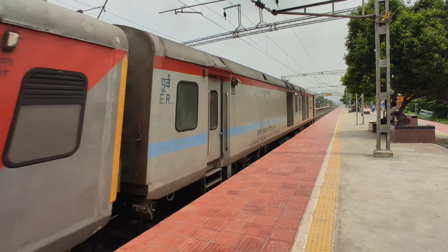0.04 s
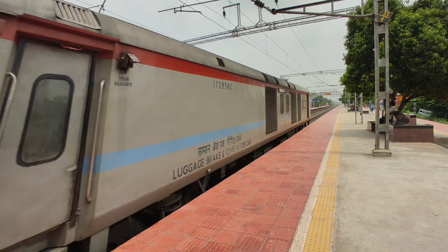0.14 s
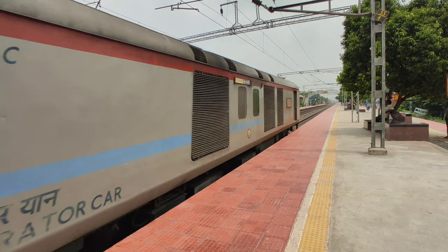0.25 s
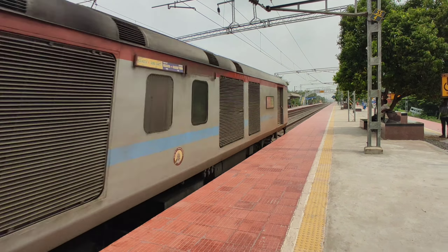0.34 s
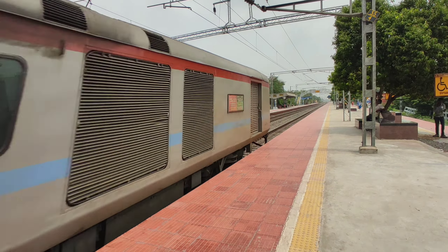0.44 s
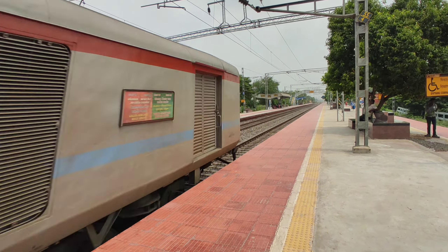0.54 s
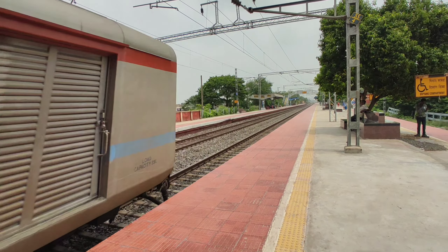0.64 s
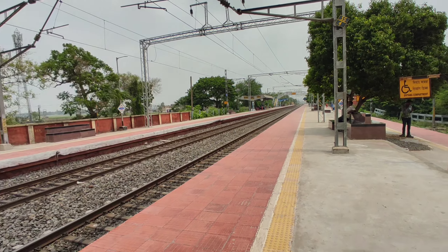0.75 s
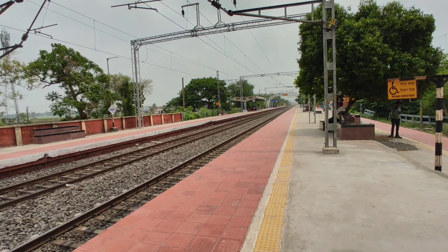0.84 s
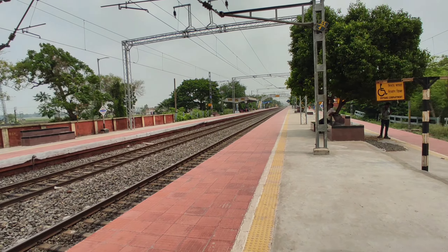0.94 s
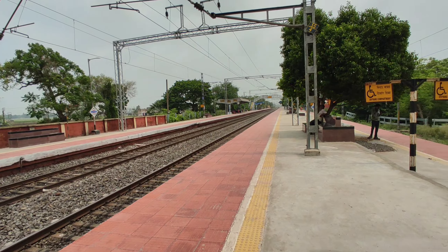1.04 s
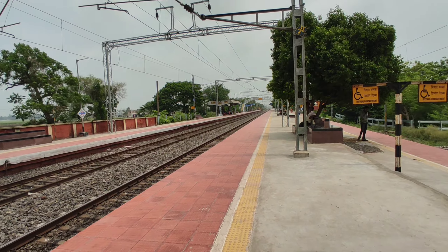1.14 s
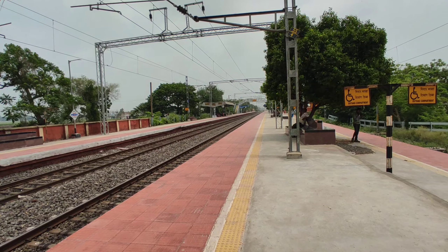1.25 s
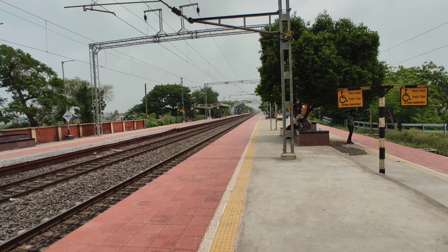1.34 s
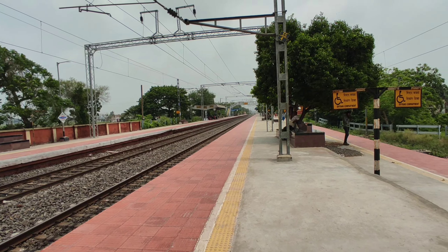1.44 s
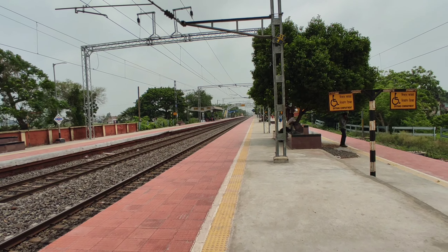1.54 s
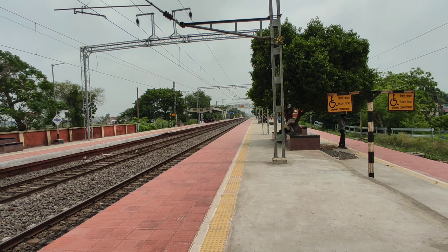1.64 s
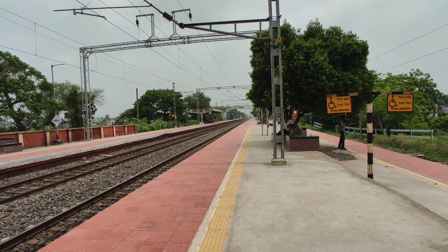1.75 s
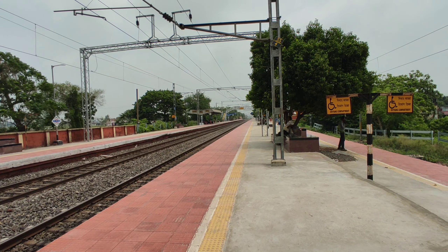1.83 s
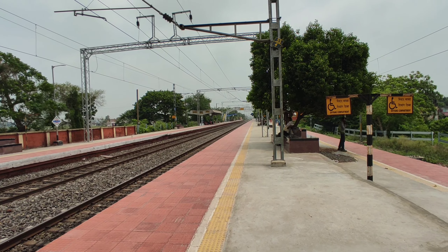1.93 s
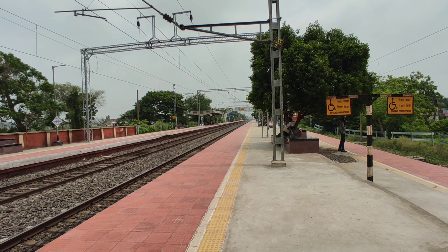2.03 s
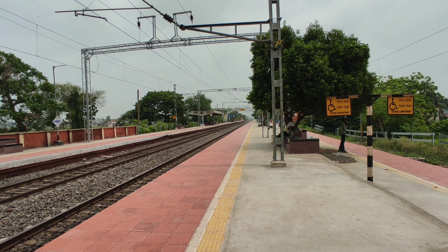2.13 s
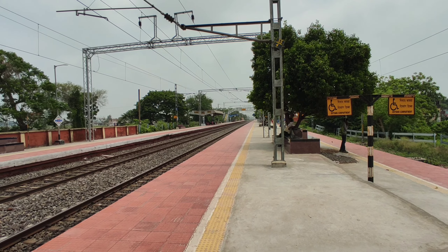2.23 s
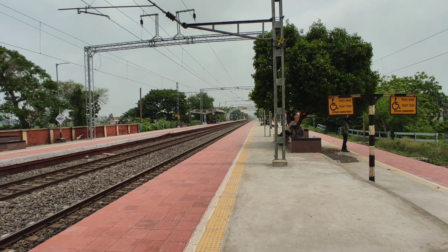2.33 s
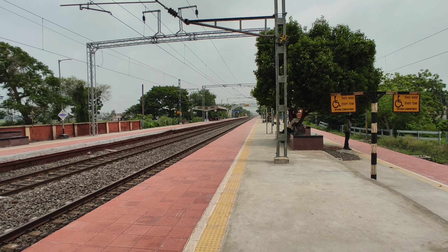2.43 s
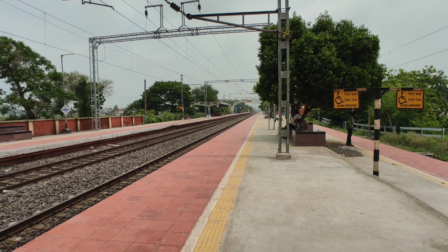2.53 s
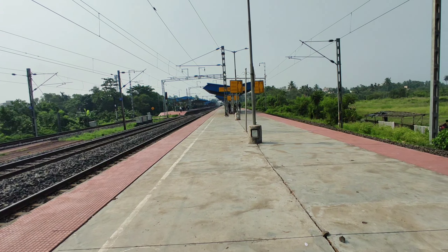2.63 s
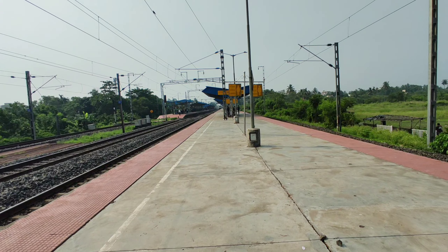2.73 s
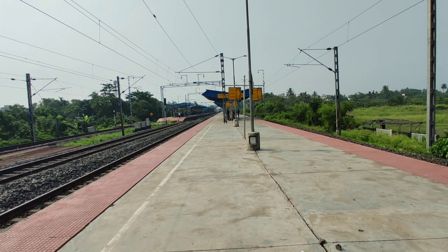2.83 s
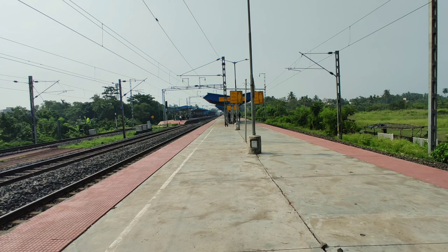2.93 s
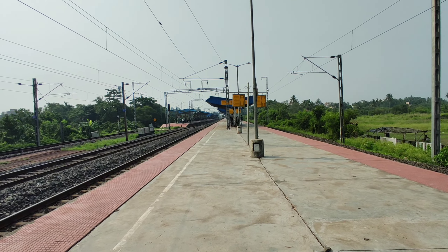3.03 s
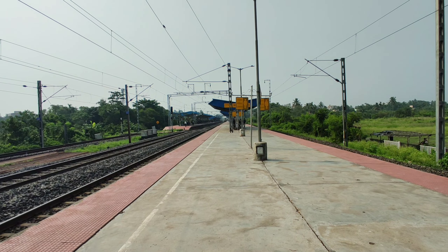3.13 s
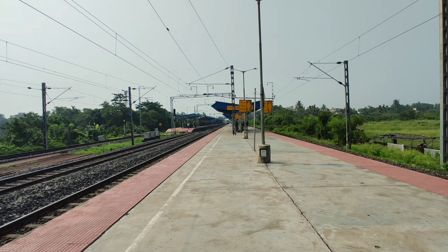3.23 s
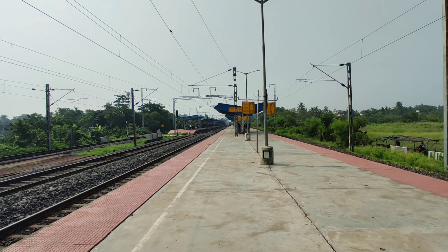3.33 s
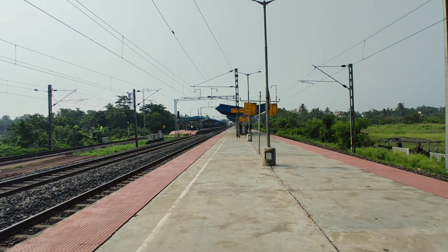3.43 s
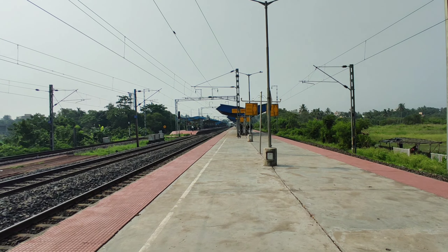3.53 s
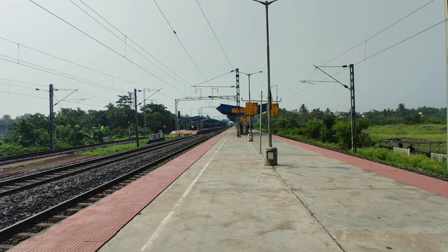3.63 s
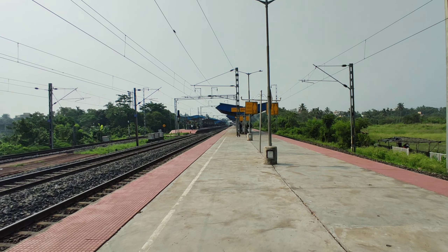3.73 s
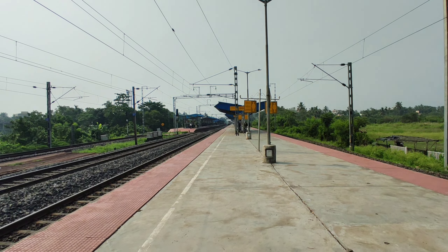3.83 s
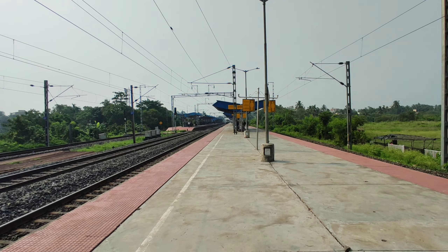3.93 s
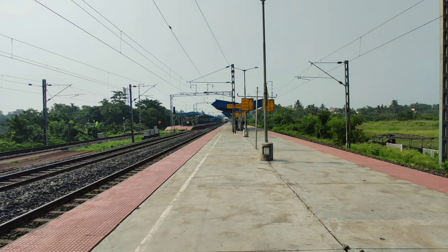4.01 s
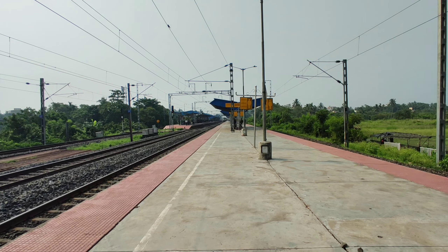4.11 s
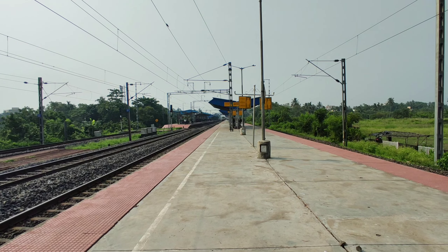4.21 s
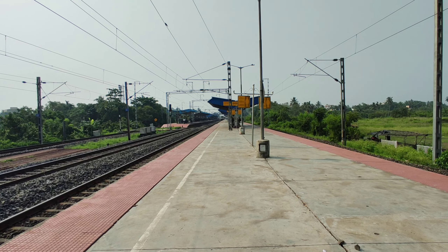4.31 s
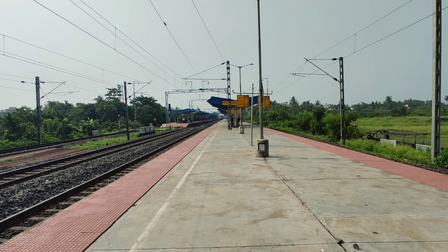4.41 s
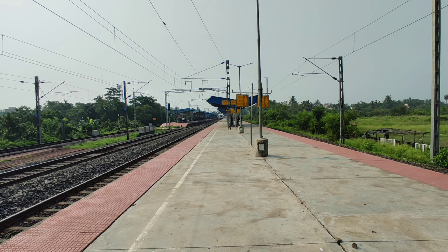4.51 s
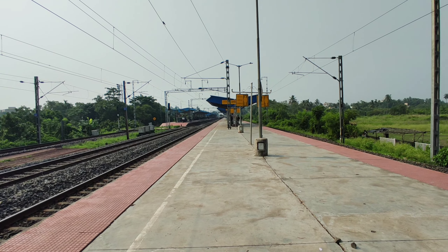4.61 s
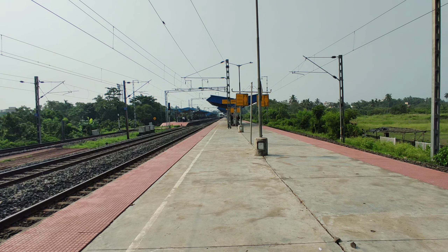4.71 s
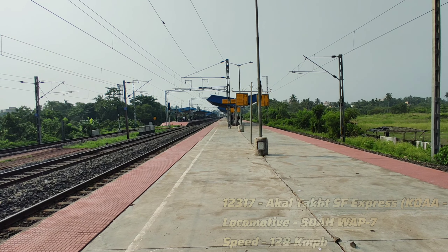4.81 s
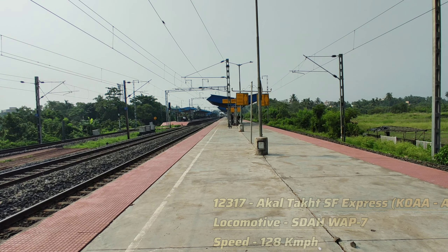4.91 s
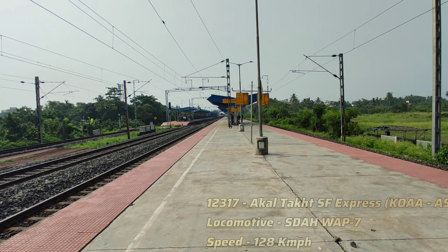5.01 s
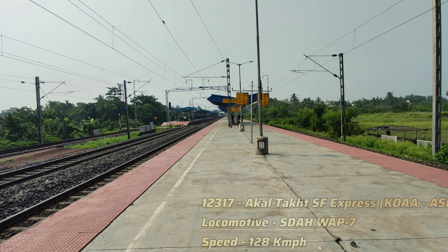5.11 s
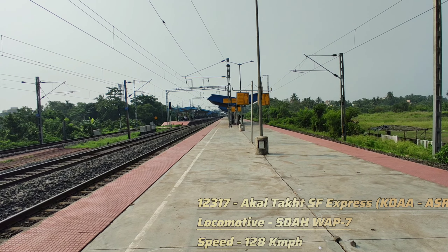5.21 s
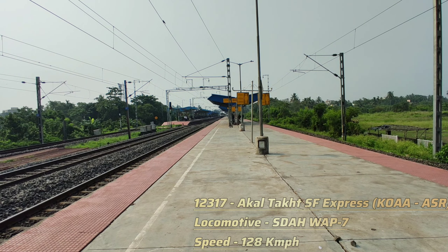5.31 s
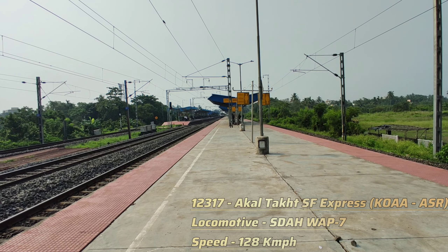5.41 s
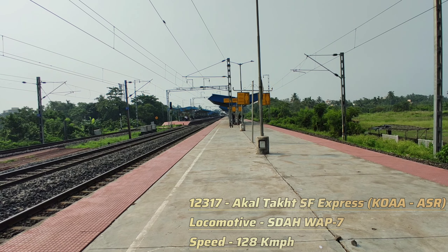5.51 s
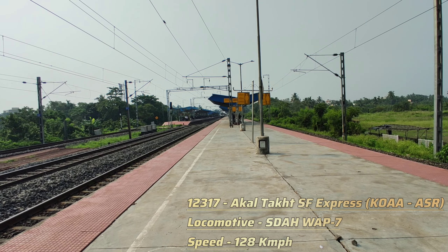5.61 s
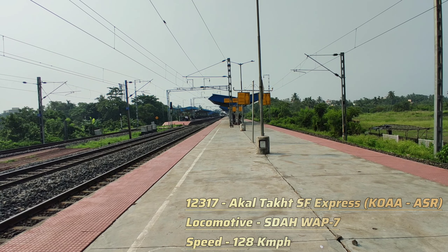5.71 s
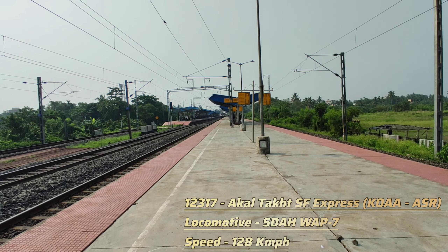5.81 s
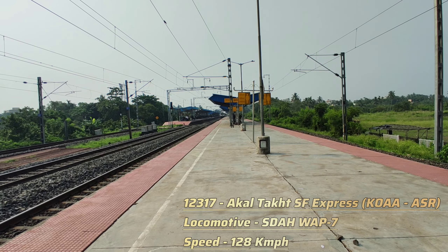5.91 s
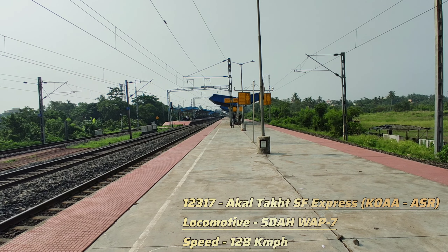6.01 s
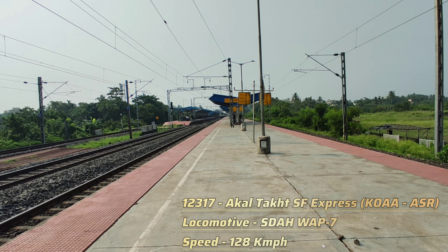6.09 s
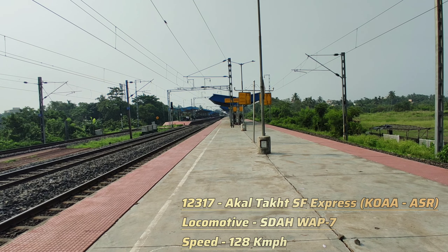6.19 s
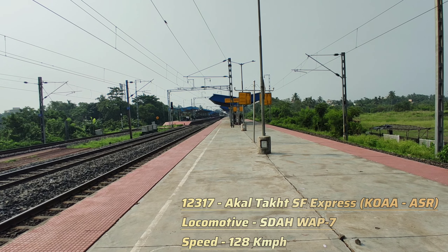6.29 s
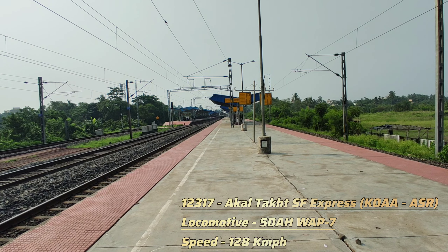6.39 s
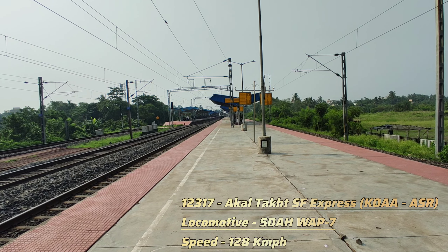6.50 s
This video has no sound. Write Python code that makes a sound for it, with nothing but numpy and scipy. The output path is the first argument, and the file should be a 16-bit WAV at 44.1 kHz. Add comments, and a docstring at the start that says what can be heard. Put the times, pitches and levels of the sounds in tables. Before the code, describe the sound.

Loud train tail rushes by and buffets the mic with wind, cutting suddenly to faint rail hum, rising engine drones, bird calls and a sharp click.

```python
"""The last coaches of an express rush past a platform: rumbling bodies, roaring and ringing rails, hissing wheels.
Their wake buffets the microphone with lumpy gusts and short thumps of air.
The sound cuts to a quiet platform: another train hums, sings and whines far up the line, slowly nearing.
A distant engine gathers speed in steady drones, and clicks snap close by.
Birds call in gliding, fluttering tones, once already during the pass."""
import sys
import numpy as np
from scipy import signal
from scipy.fft import rfft, irfft, next_fast_len
from scipy.io import wavfile
from scipy.ndimage import uniform_filter1d, map_coordinates

SR = 44100
rng = np.random.default_rng(int(sys.argv[2]) if len(sys.argv) > 2 else 0)


def master_out(mix):
    """Clip the mix to full scale and print it as 16-bit PCM to the path in sys.argv[1]."""
    frames = np.transpose(np.atleast_2d(mix))
    ceiling = np.clip(frames, -1, 1)
    pcm = np.round(ceiling * 32767).astype(np.int16)
    wavfile.write(sys.argv[1], SR, pcm)


N = 288855
T = np.arange(N) / SR  # time of every sample in s
CUT_S = 2.622  # the pass ends and the quiet platform begins
TAIL_S, SPEED_M_PER_S = 1.19, 35.5  # when the end of the train goes by, and how fast


def amp(db):
    """Turns decibels into gain."""
    return 10 ** (np.asarray(db) / 20)


def unit(x):
    """Scales a sound to an rms (average strength) of 1."""
    return x / np.sqrt(np.mean(x ** 2) + 1e-20)


def column(rows, order=1):
    """Draws straight lines through one column of a table whose first column is time."""
    rows = np.array(rows)
    return np.interp(T, rows[:, 0], rows[:, order])


def read(points, hz, order=1):
    """Reads one column of a frequency table, in between its points on a log-frequency axis."""
    points = np.array(points)
    return np.interp(np.log(hz + 1), np.log(points[:, 0] + 1), points[:, order])


def pan(side_db):
    """Gives left and right gains for a level difference; positive is louder on the left."""
    gains = amp(np.array([[.5], [-.5]]) * side_db)
    return gains / np.sqrt(np.mean(gains ** 2, axis=0))


def add(mix, s, sound):
    """Mixes a stereo sound in at time s."""
    part = mix[:, max(round(s * SR), 0):][:, :sound.shape[1]]
    part += sound[:, :part.shape[1]]


def filtered(x, gain):
    """Colours a full-length sound by a gain at each frequency."""
    size = next_fast_len(N + 2048)
    hz = np.fft.rfftfreq(size, 1 / SR)
    return irfft(rfft(x, size) * gain(hz), size)[..., :N]


def wander(rate_hz, channels=1):
    """Makes slow random drift of rms 1 by keeping only the part of noise below about rate_hz."""
    return unit(filtered(rng.standard_normal((channels, N)), lambda hz: 1 / (1 + (hz / rate_hz) ** 4)))


def noise(spectrum, likeness, patchy_db):
    """Makes stereo noise of a given colour with drifting patches; the average of left and right has rms 1."""
    hz = np.fft.rfftfreq(2048, 1 / SR)
    a, b, c, d, patches = rng.standard_normal((5, N // 512 + 5, len(hz)))
    patches = uniform_filter1d(patches, size=7, axis=0)  # smooth in time
    patches = unit(uniform_filter1d(patches, size=9, axis=1))  # smooth in pitch
    same = np.clip(read(likeness, hz), -.99, .99)
    left = a + 1j * b
    right = same * left + np.sqrt(1 - same ** 2) * (c + 1j * d)
    z = np.array([left, right]) * amp(read(spectrum, hz) + patchy_db * patches)
    x = signal.istft(z.swapaxes(1, 2), nperseg=2048, noverlap=1536)[1][:, :N]
    return x / x.mean(0).std()


def left_late(x, lag_s):
    """Delays the left port by a fixed or moving time, as for sound that reaches it later."""
    return np.array([map_coordinates(x[0], [(T - lag_s) * SR], order=3, mode="mirror"), x[1]])


def bogie_swell(order):
    """Sums the power of the bogies, each falling with the square of its distance."""
    # the last bogies going by: start_s (moment nearest), roar_db, rail_ringing_db
    bogies = [(0.03, -23.5, -16.5), (0.22, -25.5, -21), (0.43, -20, -36), (0.69, -22.5, -21),
              (1.07, -21.5, -22)]
    nearest_m = 4.68
    return sum(amp(row[order]) ** 2 / (1 + (SPEED_M_PER_S * (T - row[0]) / nearest_m) ** 2) for row in bogies)


def coaches():
    """Rough wheels on rails: the bodies rumble, the rails roar and ring, the wheels hiss and ring."""
    # colours of the noises, each: pitch_hz, relative level_db per Hz
    rumble_colour = [(20, -39), (55, -2), (120, -9.5), (170, -0.5), (235, -0.5), (340, -7.5), (500, -32),
                     (900, -65)]
    roar_colour = [(200, -29), (380, -8), (480, -0.5), (560, -2.5), (680, -0.5), (850, -5.5), (1050, -7.5),
                   (1350, -9.5), (1650, -8.5), (2000, -9.5), (2500, -15.5), (3300, -14), (7000, -27.5)]
    hiss_colour = [(800, -11.5), (1500, -3.5), (2000, -1), (2600, 5), (3400, -3.5), (4500, -1.5),
                   (6000, -2.5), (8000, -1.5), (15000, -6.5)]
    # ringing of the rails before the pitch shift below: pitch_hz, relative level_db per Hz
    ring_colour = [(650, -14.5), (820, 1.5), (930, 3), (985, 2.5), (1040, 4), (1130, -1.5), (1230, -4),
                   (1800, -31.5)]
    # ringing of the wheels: pitch_hz, half_width_hz, relative level_db
    wheel_modes = [(1793, 26, 5), (2264, 80, 1), (2424, 70, -3)]
    # stereo image: pitch_hz, left-right likeness (1 = the same)
    near_likeness = [(60, 0.68), (130, 1), (290, 1), (630, 0.42), (1380, 0.41), (2500, 0.18), (5000, 0.035)]
    body_m = 13.1  # distance from which the coach bodies are heard
    rumble_db, roar_db, wheel_db, hiss_db = -23, -27, -31, -20  # beside the train
    bogie_hiss_db = -12.5  # hiss of a bogie relative to its roar
    linger_roar_db, linger_ring_db, linger_wheel_db, linger_hiss_db = -40, -49, -41.5, -41.5  # steady floors
    rumble_fall, hiss_fall = 0.78, 2.08  # how fast each dies away, relative to the roar
    behind_side_db = 5  # left-right level once the train is behind
    near_lag_s, behind_lag_s = 0.000393, 0.00013  # left port hears it later: beside it, behind it
    ring_shift = .05  # the rails ring this share higher before the tail passes, lower after

    # share of the track's angle filled by the train
    in_view = .5 - np.arctan(SPEED_M_PER_S * (T - TAIL_S) / body_m) / np.pi
    near_db = 10 * np.log10(in_view)
    side_db = behind_side_db * (1 - in_view)

    # powers add up, then the root gives the level
    roar_swell = bogie_swell(order=1)
    roar_level = np.sqrt(roar_swell + amp(roar_db) ** 2 * in_view + amp(linger_roar_db) ** 2)
    ring_level = np.sqrt(bogie_swell(order=2) + amp(linger_ring_db) ** 2)
    wheel_level = np.sqrt(amp(wheel_db) ** 2 * in_view + amp(linger_wheel_db) ** 2)
    body_hiss = amp(hiss_db + hiss_fall * near_db) ** 2
    bogie_hiss = amp(bogie_hiss_db) ** 2 * roar_swell
    hiss_level = np.sqrt(body_hiss + bogie_hiss + amp(linger_hiss_db) ** 2)

    judder = wander(rate_hz=20)  # uneven contact shakes roar, rails and hiss together
    rumble = noise(rumble_colour, near_likeness, patchy_db=1.5) * pan(side_db=3.0)
    rumble *= amp(rumble_db + rumble_fall * near_db)
    roar = roar_level * amp(2.05 * judder) * noise(roar_colour, near_likeness, patchy_db=0.5)
    # playing the ringing faster, then slower, shifts its pitch
    clock = np.cumsum(1 + ring_shift * (2 * in_view ** 2 - 1)) / SR
    ringing = noise(ring_colour, near_likeness, patchy_db=3.5)
    rails = np.array([np.interp(clock, T, port) for port in ringing])
    rails *= ring_level * amp(0.74 * judder)
    hiss = hiss_level * amp(0.17 * judder) * noise(hiss_colour, near_likeness, patchy_db=2.5)
    modes = lambda hz: sum(amp(db) / (1 + ((hz - f) / width) ** 2) for f, width, db in wheel_modes)
    wheels = unit(filtered(rng.standard_normal((2, N)), modes))
    wheels *= wheel_level * amp(2.5 * wander(rate_hz=7, channels=2))
    train = rumble + (roar + rails + wheels) * pan(side_db) + hiss * pan(0.066 * side_db)
    return left_late(train, behind_lag_s + (near_lag_s - behind_lag_s) * in_view)


def flange():
    """A wheel flange grazes the rail as it goes by: a brief, rough singing made of narrow noise."""
    middle_s, spread_s = 0.433, 0.036
    pitch_hz, half_width_hz, level_db = 2460, 80, -20.5
    resonance = lambda hz: 1 / (1 + ((hz - pitch_hz) / half_width_hz) ** 2)
    tone = unit(filtered(rng.standard_normal((2, N)), resonance))
    return amp(level_db) * np.exp(-.5 * ((T - middle_s) / spread_s) ** 2) * tone


def wake():
    """Gusts of lumpy turbulence, different at each port, and single eddies that thump on it."""
    # colour of the turbulence: pitch_hz, relative level_db per Hz
    wake_colour = [(15, 8.5), (40, 7.5), (80, 5), (125, 0.5), (190, 14), (260, -6), (400, 4), (700, -46),
                   (1500, -59)]
    # gusts of the wake: middle_s, level_db
    gust_table = [(1.1, -41), (1.99, -28.5), (2.15, -22), (2.4, -23), (2.63, -31)]
    # strongest eddies that hit the microphone: middle_s, relative level_db, centre_hz, left-right side_db
    eddies = [(0.808, -4.5, 483, -8), (0.865, -4.5, 534, -9), (1.05, -6, 467, 6), (1.463, -13.5, 355, 6),
              (1.504, -9.5, 480, 6), (1.722, -9, 173, -61), (1.807, -10, 318, -28),
              (1.832, -11.5, 270, -24), (2.115, -10, 276, -23), (2.171, -10, 302, -32),
              (2.345, -6.5, 460, -12), (2.454, -14.5, 280, 17), (2.485, -21, 177, -20),
              (2.608, -7.5, 430, -31)]
    gust_s, between_db = 0.11, -31.5  # half length of a gust; the draught between gusts
    small_db, small_hz, small_side_db, small_end_s = -14, 177, -25, 2.45  # weak eddies in between
    eddy_cycles = 1.2  # length of an eddy in periods of its centre frequency: small ones pass faster
    thump_hz, thump_decay_s, thump_db = 191, 0.02, -14.5  # the short boom that follows each eddy

    lumps_db = 0.53 * wander(rate_hz=42, channels=2)
    gusts = sum(amp(db) ** 2 * np.exp(-((T - s) / gust_s) ** 2) for s, db in gust_table)
    draught = amp(between_db) * np.clip(T / TAIL_S, 0, 1) ** 2  # builds up until the tail goes by
    turbulence = unit(noise(wake_colour, [(100, 0.076)], patchy_db=-2.0) * amp(lumps_db))
    out = np.sqrt(gusts + draught ** 2) * turbulence * pan(side_db=-4.0)

    t = np.arange(-SR // 10, SR // 10) / SR
    hz = np.fft.rfftfreq(len(t), 1 / SR)
    small_times = rng.uniform(TAIL_S, small_end_s, size=6)
    small = [(s, small_db, small_hz, small_side_db) for s in small_times]
    for s, db, centre_hz, side_db in eddies + small:
        # small swirls ride on the big one
        band = (hz / centre_hz) ** 2 / (1 + (hz / centre_hz) ** 5.5)
        swirls = irfft(rfft(rng.standard_normal(len(t))) * band, len(t))
        puff = swirls / (1 + (t * centre_hz / eddy_cycles) ** 2)
        # one quick pressure swing as its centre passes
        swing = np.pi * centre_hz * t
        core = (1 - 2 * swing ** 2) * np.exp(-swing ** 2)
        boom = (t > 0) * np.exp(-abs(t) / thump_decay_s) * np.sin(2 * np.pi * thump_hz * t)
        eddy = 0.71 * puff / abs(puff).max() + 0.57 * core - amp(thump_db) * boom
        add(out, s + t[0], amp(db) * eddy * pan(side_db))
    return out


def far_train():
    """A low hum, the song of the rails and a thin whine wavering in the air; song and airy noise grow louder."""
    # colours of hum, rail song and airy noise, each: pitch_hz, relative level_db per Hz
    hum_colour = [(15, -4.5), (35, 2), (70, -4), (110, -3.5), (140, -4.5), (170, -3), (215, -13),
                  (260, -9.5), (370, -17), (600, -25.5), (1000, -67)]
    song_colour = [(450, -20), (660, -10.5), (730, 4), (820, 6.5), (880, 8), (970, -25), (1200, -50)]
    air_colour = [(300, -11.5), (600, -1.5), (1100, 3), (1320, -3.5), (1580, 1), (1780, -3), (2100, -5.5),
                  (2600, -4), (3200, -19), (3900, -12.5), (4700, -23), (8500, -18)]
    # stereo image: pitch_hz, left-right likeness (1 = the same)
    far_likeness = [(60, 0.91), (130, 1), (290, 0.7), (700, 0.97), (1380, 0.037), (3000, 0.27)]
    # whine before its wavering: time_s, pitch_hz, level_db (before a 1.5 dB cut)
    whine_table = [(2.72, 864, -58), (3.3, 862, -58), (3.52, 865, -48.5), (3.68, 866, -52.5),
                   (4.3, 861, -53.5), (4.45, 865.6, -45), (4.95, 858.5, -49.5), (5.1, 866, -66),
                   (5.32, 866, -44), (5.64, 867, -49.5), (5.8, 869, -40), (6.15, 869, -42),
                   (6.41, 867, -46), (6.5, 877, -47)]
    # octave of the whine before its flicker: time_s, level_db
    octave_table = [(2.7, -71), (3.3, -67), (3.6, -58.5), (4.4, -60.5), (6.5, -60.5)]
    hum_db, song_db, air_db = -51.5, -55.5, -57.5  # song and air: at the cut
    song_rise_db_per_s, air_rise_db_per_s = 3, 2.5

    since = np.maximum(T - CUT_S, 0)
    hum = amp(hum_db) * noise(hum_colour, far_likeness, patchy_db=0.0) * pan(side_db=4.5)
    song = noise(song_colour, far_likeness, patchy_db=1.2) * pan(side_db=4.5)
    song *= amp(song_db + song_rise_db_per_s * since)
    air = noise(air_colour, far_likeness, patchy_db=2.5) * pan(side_db=1.5)
    air *= amp(air_db + air_rise_db_per_s * since)

    turns = np.cumsum(column(whine_table, order=1) + 1.218 * wander(rate_hz=7.25)) / SR
    phase = 2 * np.pi * turns + 0.51 * wander(rate_hz=3.0, channels=2)
    whine_db = column(whine_table, order=2) - 1.5 + 2.0 * wander(rate_hz=3.2, channels=2)
    whine = amp(whine_db) * np.sin(phase) * pan(side_db=9.5)
    flicker = wander(rate_hz=7.1, channels=2)  # the air breaks the octave up more than the fundamental
    octave = amp(column(octave_table, order=1)) * flicker * np.sin(2 * phase) * pan(side_db=-6.5)
    return hum + song + air + np.sqrt(2) * (whine + octave)  # the root gives each sine rms 1


def far_engine():
    """An engine slowly speeds up; three clean drones take turns to swell, under weak wavering overtones."""
    # levels of the main drones: time_s, 7th_harmonic_db, 8th_harmonic_db, 9th_harmonic_db
    drone_table = [(2.65, -64, -58, -49.5), (2.95, -66, -56, -51), (3.15, -70, -52, -61),
                   (3.5, -66, -53, -53), (3.75, -62, -68, -52), (4.1, -56, -66, -52), (4.3, -53, -53, -64),
                   (4.65, -52, -53, -62), (5.05, -54, -54, -66), (5.3, -53, -61, -70),
                   (6.05, -50, -64, -66), (6.4, -61, -63, -62)]
    # cycle rate at the cut, rate it tends to, and time constant
    start_hz, top_hz, rise_s = 18.75, 33.7, 8.6
    overtone_db = -66

    hz = top_hz + (start_hz - top_hz) * np.exp((CUT_S - T) / rise_s)
    turns = np.cumsum(hz) / SR
    levels_db = [column(drone_table, order=k) for k in (1, 2, 3)]
    levels_db += list(overtone_db + 3 * wander(rate_hz=2, channels=5))
    drones = np.zeros(N)
    for harmonic, db in enumerate(levels_db, 7):
        drones += amp(db) * np.sin(2 * np.pi * (harmonic * turns + rng.random()))
    return drones * pan(side_db=5.5)


def birds():
    """Fluttering, more or less raspy calls that glide through their pitches, scattered by the open ground."""
    # pure whistles, reedy calls and rising chirps, each:
    # start_s, length_s, start_hz, middle_hz, end_hz, relative level_db, roughness (0-1)
    whistles = [(3.255, 0.14, 2700, 2960, 3340, -57, .2), (4.618, 0.16, 2640, 2730, 2610, -46, 0.13),
                (4.81, 0.119, 2696, 2515, 2610, -47.5, .1), (5.277, 0.055, 2500, 2360, 2290, -53, .15)]
    reedy_calls = [(2.8, .1, 1260, 1290, 1280, -63, .4), (2.96, 0.24, 1340, 1244, 1260, -59.5, 0.14),
                   (3.495, 0.072, 1260, 1280, 1295, -64, 0.42), (3.835, .09, 1270, 1310, 1280, -58, 0.76),
                   (3.925, .07, 1284, 1242, 1180, -58, 0.28), (5.35, 0.12, 1285, 1353, 1335, -55, .5),
                   (5.467, 0.034, 1190, 1195, 1210, -51.5, .2), (5.65, .08, 1215, 1250, 1250, -60, .7),
                   (6.18, 0.11, 1300, 1330, 1370, -54.5, .25)]
    chirps = [(2.635, .06, 1690, 1740, 1765, -70, .1), (2.87, 0.077, 1660, 1760, 1800, -60, 0),
              (4.915, .085, 1660, 1736, 1870, -57.5, 0.25), (5.09, 0.14, 1715, 1790, 1830, -63, 0.4)]
    # high slurs: start_s, length_s, start_hz, early_hz, late_hz, end_hz, relative level_db, roughness (0-1)
    slurs = [(2.165, 0.13, 3720, 4070, 4150, 4160, -38.5, 0.7),
             (3.655, .071, 3860, 4120, 3670, 3250, -58.5, .3),
             (3.845, .13, 3530, 3440, 3050, 2780, -56.5, 0.4),
             (5.555, .062, 4050, 4160, 3930, 3360, -56, 0),
             (5.738, 0.14, 3430, 3610, 3330, 2800, -56.5, 0.34)]
    # strength of each kind's harmonics, from the fundamental up: one relative level_db each
    whistle_harmonics = (0, -24, -21)
    reedy_harmonics = (-15, 0, -14, -15, -14, -18)
    chirp_harmonics = (-20, 0, -6, -10)
    slur_harmonics = (0, -17)
    rasp_depth, flutter_db = .04, 2.8  # pitch shake at roughness 1, as a share; level shake
    echo_s = .13  # time for the echoes to fall by 60 dB

    out = np.zeros((2, N))
    kinds = [(whistles, whistle_harmonics), (reedy_calls, reedy_harmonics),
             (chirps, chirp_harmonics), (slurs, slur_harmonics)]
    for calls, harmonics in kinds:
        for s, length, *pitches_hz, db, rough in calls:
            u = np.linspace(0, 1, int(length * SR))  # progress through the call
            # a smooth curve through the listed pitches
            spots = np.linspace(0, 1, len(pitches_hz))
            hz = np.polyval(np.polyfit(spots, pitches_hz, len(pitches_hz) - 1), u)
            chance = rng.standard_normal((1 + len(harmonics), SR // 2))
            rasp = unit(uniform_filter1d(chance[0], size=70))[:len(u)]
            # each partial breaks up on its own
            flutter = unit(uniform_filter1d(chance[1:], size=600))[:, :len(u)]
            phase = 2 * np.pi * np.cumsum(hz * (1 + rasp_depth * rough * rasp)) / SR
            call = np.zeros(len(u))
            for k, level_db in enumerate(harmonics, 1):
                call += amp(level_db + flutter_db * flutter[k - 1]) * np.sin(k * phase)
            swell = np.sqrt(abs(np.sin(np.pi * u)))
            add(out, s, amp(db) * call * swell * pan(side_db=3.0))

    t = np.arange(SR // 2) / SR
    scatter = rng.standard_normal((2, len(t))) * amp(-60 * t / echo_s)
    echoes = signal.fftconvolve(out, scatter / np.linalg.norm(scatter[0]), axes=1)[:, :N]
    return .8 * out + .55 * echoes


def clicks():
    """Dry snaps: noise that starts at once and dies quickly, with a short weaker tail."""
    # small clicks nearby: start_s, level_db, decay_s
    click_table = [(2.985, -55, .002), (4.243, -49, .008), (4.5113, -26.5, .0012)]
    # colour of the clicks: pitch_hz, relative level_db per Hz
    click_colour = [(300, -12), (900, 10), (2000, 10), (3200, 8.5), (5500, -10), (7800, 9.5), (10000, -2),
                    (15000, 6)]
    tail_db, tail_s = -16, .011  # tail relative to its snap, and its decay

    snap = np.zeros(N)
    for s, db, decay_s in click_table:
        age = np.maximum(T - s, 0)
        fade = np.exp(-age / decay_s) + amp(tail_db) * np.exp(-age / tail_s)
        snap += amp(db) * (T >= s) * fade
    return snap * noise(click_colour, [(1000, 0.45)], patchy_db=1.5)


def scene():
    """The loud pass, then an abrupt cut to the quiet platform; birds and clicks are mixed over both."""
    after = np.clip((T - CUT_S) / .002, 0, 1)  # a 2 ms crossfade
    loud_pass = coaches() + flange() + wake()
    far_lag_s = 0.00013  # the far sounds reach the left port this much later
    platform = left_late(far_train() + far_engine(), far_lag_s)
    return (1 - after) * loud_pass + after * platform + birds() + clicks()


def record(dry):
    """Each port has its own treble resonance and hiss; the highest peaks round off; then the band limit."""
    # resonances of the two microphone ports: pitch_hz, left_db, right_db
    ports = [(6330, 1.5, 1.5), (6900, 1.5, 3.5), (8120, 1.5, 7), (9320, 0.5, 1), (9150, 8.5, 0.5),
             (10340, -2.5, -24), (10800, -23, -29), (12500, -17.5, -20.5), (15000, -31, -27)]
    # colour of the microphone hiss: pitch_hz, relative left_db per Hz, relative right_db per Hz
    mic_hiss = [(2760, -0.5, -4.5), (4770, -16, -11.5), (6960, -40, -7), (8000, -3.5, -1.5), (8900, 4, -12),
                (9850, -38, -34), (10800, -16, -12.5), (14600, -16, -18)]
    edge_hz = 15000  # top of the band

    both = lambda table: lambda hz: amp([read(table, hz, order=1), read(table, hz, order=2)])
    hiss = amp(-54.5) * unit(filtered(rng.standard_normal((2, N)), both(mic_hiss)))
    heard = filtered(dry, both(ports)) + hiss
    heard = heard / (1 + abs(heard) ** 8) ** (1 / 8)  # bends peaks near full scale
    lowpass = signal.firwin(511, edge_hz, window=("kaiser", 9), fs=SR)
    return signal.oaconvolve(heard, lowpass[None], "same")


dry = scene()
out = record(dry)
master_out(out)
```